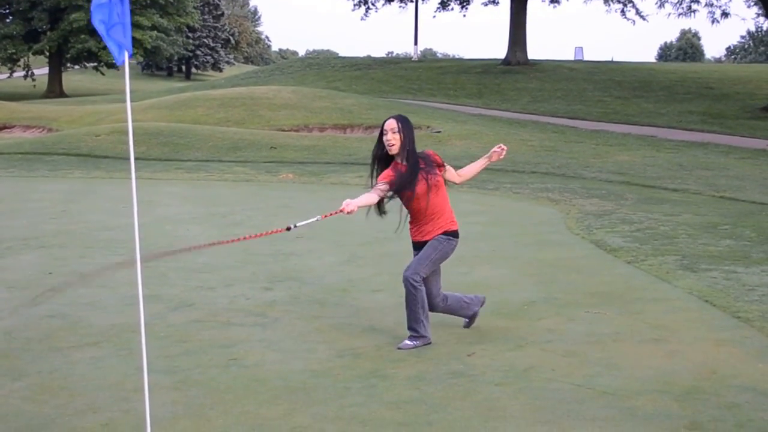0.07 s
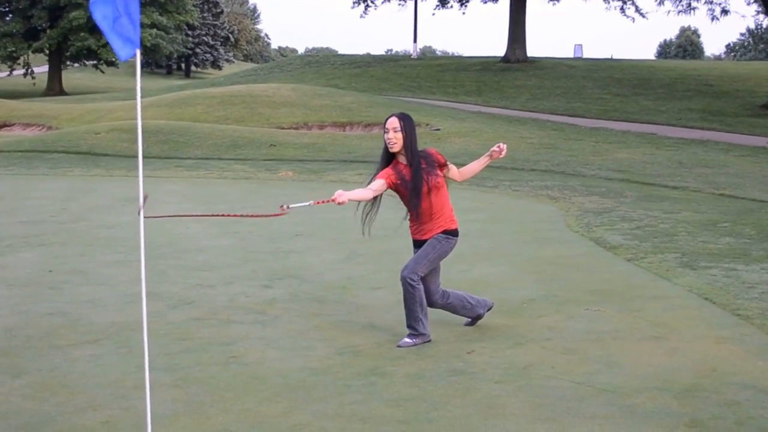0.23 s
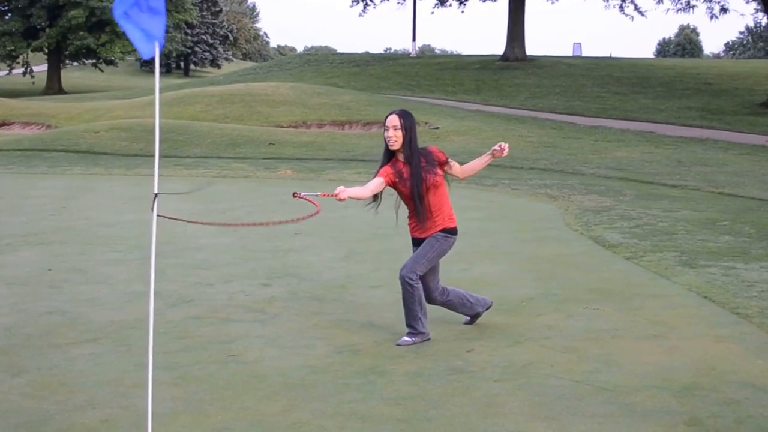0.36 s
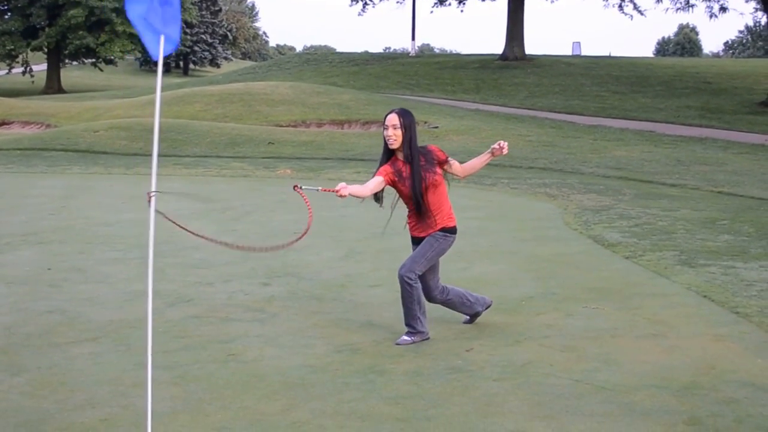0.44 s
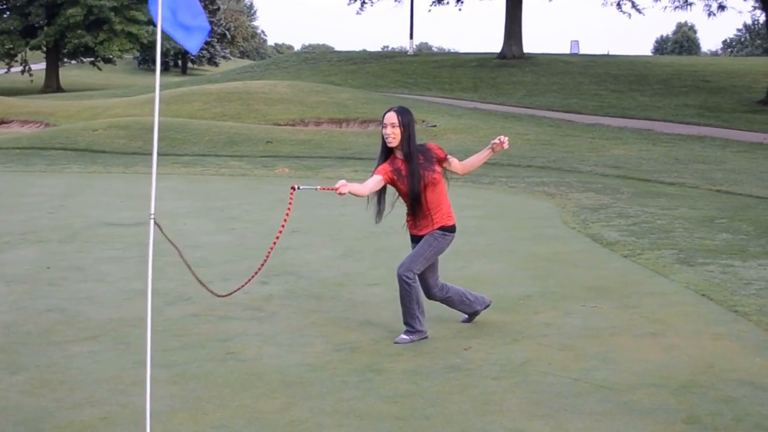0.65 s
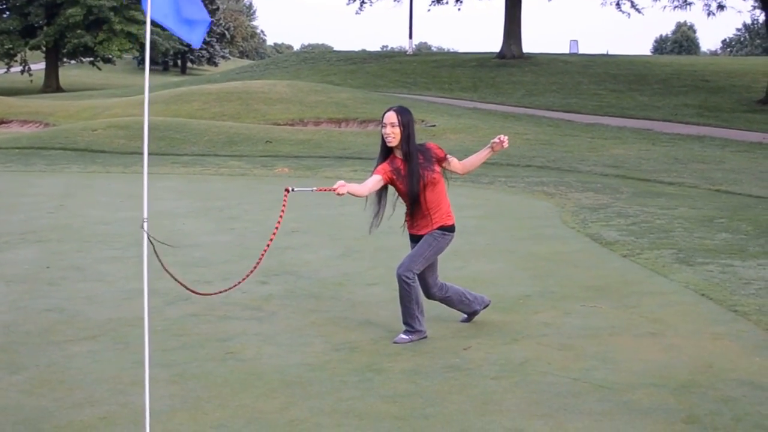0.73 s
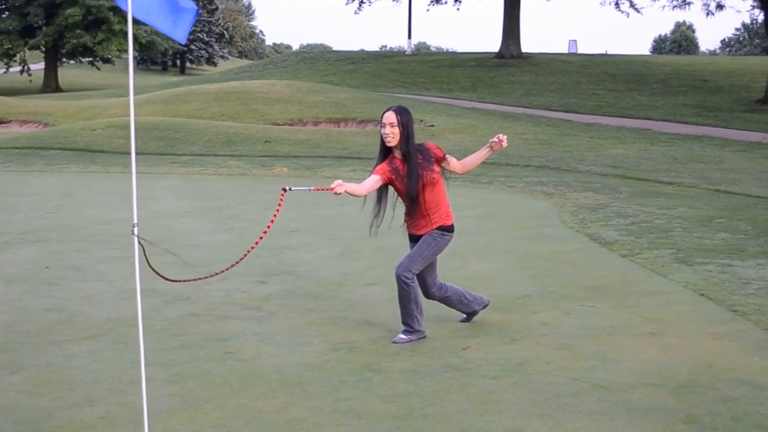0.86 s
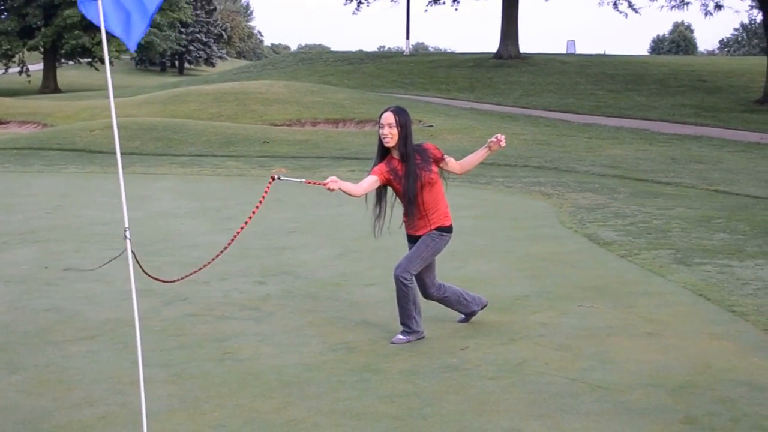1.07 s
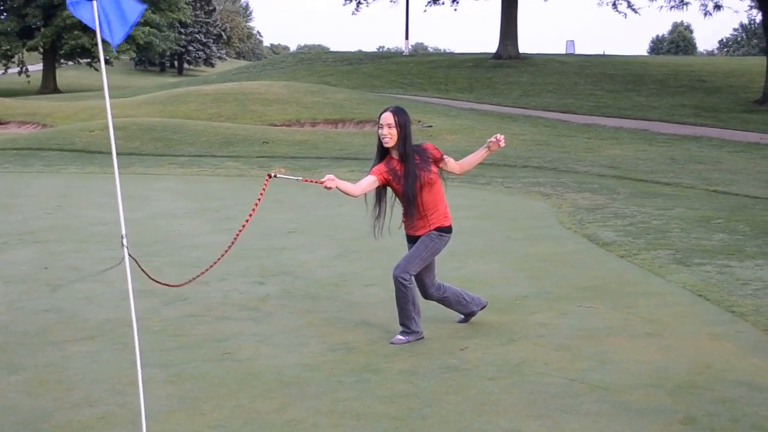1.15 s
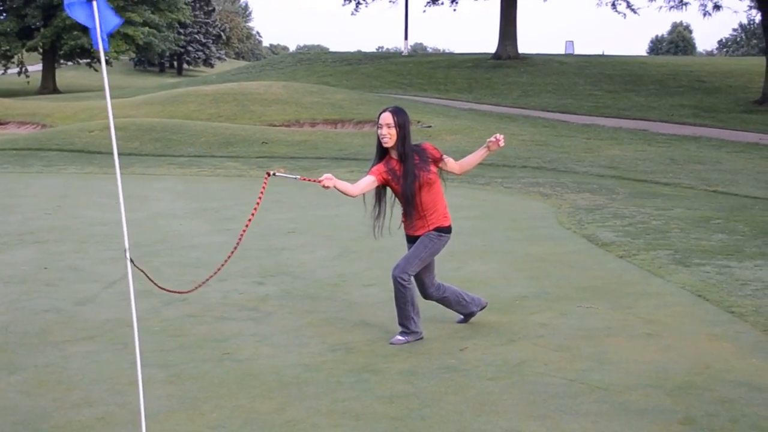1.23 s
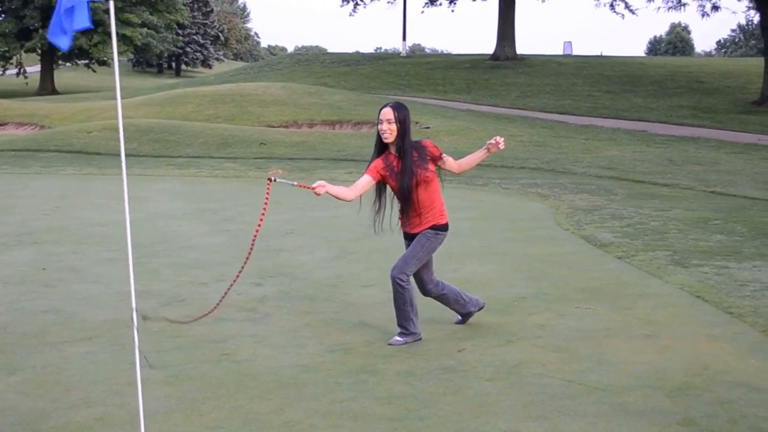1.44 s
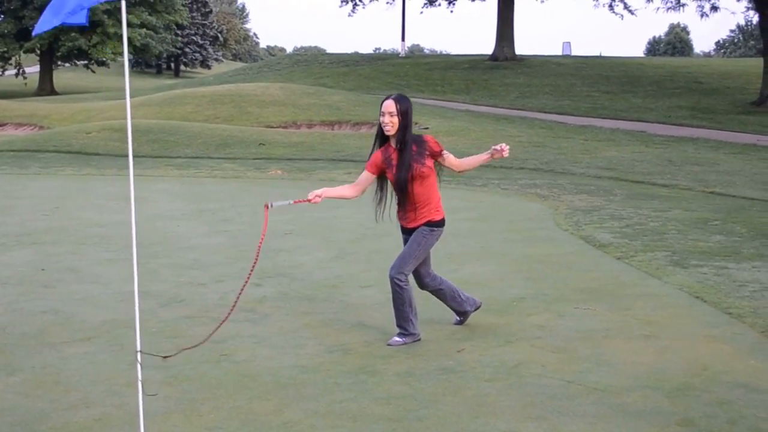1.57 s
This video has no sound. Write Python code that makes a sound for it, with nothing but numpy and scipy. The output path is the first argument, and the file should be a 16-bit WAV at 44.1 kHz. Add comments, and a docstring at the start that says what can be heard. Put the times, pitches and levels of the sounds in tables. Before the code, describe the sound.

A whip crack dominates: a swish accelerates from the start, rushing up to one very loud, clipped snap at 0.22 s with a brief noisy wake. From about 0.25 to 0.4 s trees throw back spiky, knocking echoes, then dull thuds until 0.55 s and a darkening tail. Distant traffic, faint motor hum and thin insect buzz continue; tiny lash rustles at 0.9-1.3 s, two faint bird notes near 1.4-1.5 s.

```python
"""Distant traffic, a motor hum and a thin pulsing insect lie under everything on an open lawn.
A whip's lash swishes faster and faster, with a soft push and a last rush of noise, then cracks once.
The crack is a few damped tones that overload the microphone, with a noisy wake and a thin ring on top.
Trees near and far return shaped noise and hard knocks, a rough, darkening echo with late dull thuds.
Then small rustles of noise are heard as the lash slides down a pole, and a faint bird whistles twice."""
import sys
import numpy as np
from scipy import signal
from scipy.fft import rfft, irfft, next_fast_len
from scipy.io import wavfile
from scipy.ndimage import uniform_filter1d, map_coordinates

SR = 44100
rng = np.random.default_rng(int(sys.argv[2]) if len(sys.argv) > 2 else 0)


def store_wav(level_fs):
    """Save 16-bit WAV to argv[1]."""
    pcm = np.round(np.clip(np.atleast_2d(level_fs), -1, 1) * 32767)
    wavfile.write(sys.argv[1], SR, pcm.T.astype(np.int16))


def to_linear_factor(level_db):
    """Convert decibel levels (scalar or array-like) to linear amplitude factors."""
    exponent = np.asarray(level_db, float) / 20
    return 10 ** exponent


N = 70560  # length in samples
T = np.arange(N) / SR  # time in seconds
CRACK_S = .220537  # moment of the shock


def unit(x):
    """Scales a sound to rms 1."""
    return x / np.sqrt(np.mean(x ** 2) + 1e-20)


def coloured(x, spectrum):
    """Filters x through a (pitch_hz, level_db) curve on a log pitch axis, then scales it to rms 1."""
    size = next_fast_len(N + 8192)
    curve_hz, curve_db = np.transpose(spectrum)
    hz = np.fft.rfftfreq(size, 1 / SR)
    gain = to_linear_factor(np.interp(np.log(hz + 1), np.log(curve_hz), curve_db, -120, -120))
    return unit(irfft(rfft(x, size) * gain, size)[:N])


def noise(spectrum):
    """Steady random hiss with the given spectrum, rms 1."""
    return coloured(rng.standard_normal(N), spectrum)


def spiky_noise(spectrum, spike_db, rate):
    """Hiss whose level jumps about at random before it is coloured; rate is in knots a second."""
    return coloured(rng.standard_normal(N) * to_linear_factor(spike_db * wobble(rate)), spectrum)


def wobble(rate):
    """A smooth random curve through rate random knots a second."""
    knots = rng.standard_normal(int(N * rate / SR) + 4)
    return map_coordinates(knots, [T * rate])


def ring(start_s, hz, t60_s, attack_s):
    """A sine that sets in at start_s and dies away by 60 dB in t60_s, like a struck resonance."""
    t = np.maximum(T - start_s, 0)
    return np.sin(2 * np.pi * hz * t) * to_linear_factor(-60 * t / t60_s) * (1 - np.exp(-t / attack_s))


# Spectrum of the far roar: pitch_hz, level_db (relative, per Hz)
TRAFFIC_SPECTRUM = [(15, -59), (25, -37), (70, -8.5), (118, -5), (219, -1.5), (331, -11), (979, -5),
                    (1480, -5.5), (2070, -12.5), (2970, -15.5), (4160, -25.5), (5600, -38), (7000, -46.5),
                    (10300, -50), (11300, -68)]
# Loudness of the roar over time: time_s, level_db
TRAFFIC_LEVEL = [(0.0, -38.5), (0.266, -40.5), (1.6, -40)]


def traffic():
    """Far roar: noise made patchy in time and pitch, then coloured, with a slightly unsteady level."""
    grains = signal.stft(rng.standard_normal(N + 512), nperseg=512)[2]
    patches = uniform_filter1d(rng.standard_normal(grains.shape), 6, 0)  # smooth over pitch
    patches = unit(uniform_filter1d(patches, 8, 1))  # smooth over time
    patchy = signal.istft(grains * to_linear_factor(0.72 * patches), nperseg=512)[1][:N]
    time_s, level_db = np.transpose(TRAFFIC_LEVEL)
    level = np.interp(T, time_s, level_db) + .5 * wobble(11.0)
    return to_linear_factor(level) * coloured(patchy, TRAFFIC_SPECTRUM)


# Tones of the motor: pitch_hz, level_db (rms, before it wavers)
HUM_TONES = [(75.4, -55.5), (150.7, -56.5), (258.4, -57)]


def motor_hum():
    """Low steady tones of a motor, wavering in level and phase."""
    out = np.zeros(N)
    for pitch_hz, level_db in HUM_TONES:
        level = np.sqrt(2) * to_linear_factor(level_db + 1.5 * wobble(6.7))
        out += level * np.sin(2 * np.pi * pitch_hz * T + 1.5 * wobble(14))
    return out


def insect():
    """A thin high tone with an unsteady phase, switched in pulses whose pace drifts."""
    pitch_hz, pulses_per_s = 10590, 76
    pace = pulses_per_s + 3 * wobble(4)
    pulses = np.maximum(np.sin(2 * np.pi * np.cumsum(pace) / SR) + 0.44, 0)
    level = to_linear_factor(-82.5 + 1.5 * wobble(30))
    return level * pulses * np.sin(2 * np.pi * pitch_hz * T + .7 * wobble(300))


# Two whistled notes, each a path of points: time_s, pitch_hz, level_db (rms, before roughening)
BIRD_NOTES = [
    [(1.385, 2970, -60), (1.4, 2960, -52), (1.417, 2920, -52), (1.428, 2430, -52), (1.438, 2360, -44.5),
     (1.447, 2350, -45.5), (1.452, 2350, -60)],
    [(1.478, 2700, -60), (1.494, 2880, -55), (1.504, 3100, -50.5), (1.525, 2950, -54), (1.535, 2930, -62)],
]


def bird():
    """Two far sines that slide in pitch, roughened by the air and leaves between."""
    out = np.zeros(N)
    for note in BIRD_NOTES:
        time_s, pitch_hz, level_db = np.transpose(note)
        level = np.interp(T, time_s, level_db, -120, -120) + 2 * wobble(200)
        phase = 2 * np.pi * np.cumsum(np.interp(T, time_s, pitch_hz)) / SR
        out += np.sqrt(2) * to_linear_factor(level) * np.sin(phase + .35 * wobble(250))
    return out


# Puffs of the sliding lash: start_s, length_s (up to the fade-out), level_db, loudest_hz
RUSTLES = [(.911, .005, -59, 4500), (.9378, .0012, -47, 3200), (.941, .006, -52, 3200),
           (.985, .0015, -57, 6000), (1.121, .011, -63, 7200), (1.208, .0033, -66, 9000),
           (1.262, .013, -66, 7500), (1.278, .0054, -58, 6200), (1.286, .011, -61, 8500)]


def rustles():
    """Short grainy puffs of treble as the lash slides down a pole, each with its own loudest band."""
    edge_hz, slope_db = 10000, -9  # above its loudest pitch a puff loses 9 dB an octave up to the edge
    out = np.zeros(N)
    for start_s, length_s, level_db, loudest_hz in RUSTLES:
        fade_in = (T - start_s) / 0.0014
        fade_out = (start_s + length_s - T) / 0.0017 + 1
        shape = np.clip(np.minimum(fade_in, fade_out), 0, 1)
        edge_db = slope_db * np.log2(edge_hz / loudest_hz)
        spectrum = [(loudest_hz * 0.5, -30), (loudest_hz, 0), (edge_hz, edge_db), (11500, -45)]
        out += to_linear_factor(level_db) * shape * spiky_noise(spectrum, 2.3, 1000)
    return out


# Dull far echoes off slopes: peak_s, level_db
THUDS = [(0.446, -39.5), (0.471, -34), (0.502, -39), (0.554, -38.5)]
# Their spectrum: pitch_hz, level_db (relative, per Hz)
THUD_SPECTRUM = [(400, -35.5), (600, -5), (1100, -3), (1800, -33)]


def thuds():
    """Short low puffs of noise, swelling and fading in a bell shape as far slopes return the crack."""
    half_length_s = 0.0058
    shape = sum(to_linear_factor(level_db) * np.exp(-((T - peak_s) / half_length_s) ** 2) for peak_s, level_db in THUDS)
    return shape * noise(THUD_SPECTRUM)


# Rise and fall of the echo: time_s, level_db (before the lift below)
ECHO_LEVEL = [(0.237, -52), (.2505, -72), (.253, -41.5), (.259, -41), (0.268, -59), (.278, -55),
              (.2838, -65), (0.2863, -43), (0.288, -35.5), (0.301, -33), (.318, -31.5), (0.337, -31.5),
              (0.352, -37.5), (0.385, -36.5), (0.394, -41.5), (.43, -50.5), (.52, -55), (.545, -51),
              (.7, -53.5), (.8, -55.5), (1.199, -64.5)]
# Spectra of bright near leaves, fuller trunks and boughs, dull far trees:
# pitch_hz, level_db (relative, per Hz)
NEAR_SPECTRUM = [(500, -33), (1200, -13), (2000, -4), (2800, 3), (4500, -3.5), (6500, -6), (9560, -17),
                 (11000, -31), (11800, -73)]
MIDDLE_SPECTRUM = [(400, -27), (850, -2.5), (1270, -1.5), (3480, 0), (6000, -9), (8770, -16.5),
                   (10900, -28), (11800, -68)]
FAR_SPECTRUM = [(350, -24), (600, -19), (1000, 0), (2000, -1.5), (4040, -9), (7000, -26.5), (10400, -37),
                (11500, -70.5)]
# Cross-fades near to middle and middle to far: start_s, end_s
NEAR_TO_MIDDLE = [.305, 0.316]
MIDDLE_TO_FAR = [0.42, 0.53]
# Extra level of each spectrum: near_db, middle_db, far_db
ECHO_LIFT = [6.5, 5.5, 7.5]


def trees():
    """Spiky noise for countless small echoes, duller as they come from farther away."""
    late = np.interp(T, NEAR_TO_MIDDLE, [0, 1])
    far = np.interp(T, MIDDLE_TO_FAR, [0, 1])
    shares = [1 - late, late * (1 - far), far]
    spectra = [NEAR_SPECTRUM, MIDDLE_SPECTRUM, FAR_SPECTRUM]
    leaves = np.zeros(N)
    for share, spectrum, lift_db in zip(shares, spectra, ECHO_LIFT):
        leaves += to_linear_factor(lift_db) * np.sqrt(share) * spiky_noise(spectrum, 3, 900)
    time_s, level_db = np.transpose(ECHO_LEVEL)
    return leaves * to_linear_factor(np.interp(T, time_s, level_db, -120, -120))


# Single hard echoes: start_s, level_db, pitch_hz
TRUNKS = [(.3, -11, 4000), (.3123, -14, 3000), (.3188, -13, 3000), (.324, -9.5, 2400), (.344, -16, 1600),
          (.3761, -11, 4000)]


def trunks():
    """Very short damped tones, the hard echoes of single trunks."""
    return sum(to_linear_factor(level_db) * ring(start_s, pitch_hz, .0017, .0001)
               for start_s, level_db, pitch_hz in TRUNKS)


# Spectrum of the swish: pitch_hz, level_db (relative, per Hz)
SWISH_SPECTRUM = [(1500, -12), (2500, 3.5), (6000, -6), (10000, -11.5), (11500, -43)]


def swish():
    """Noise that swells as the lash speeds up and dies quickly after the crack."""
    level_db, rise_s, t60_s = -44, .03, .06
    rise = np.exp(np.minimum(T - CRACK_S, 0) / rise_s)
    fade = to_linear_factor(-60 * np.maximum(T - CRACK_S, 0) / t60_s)
    return to_linear_factor(level_db) * rise * fade * noise(SWISH_SPECTRUM)


def soft_push():
    """A low damped tone just ahead of the crack, starting downwards."""
    start_s, pitch_hz, level_db = .2088, 600, -23
    return -to_linear_factor(level_db) * ring(start_s, pitch_hz, .006, .0003)


# Spectrum of the last rush: pitch_hz, level_db (relative, per Hz)
RUSH_SPECTRUM = [(180, -56), (300, -29.5), (2400, -5), (3350, -17.5), (4990, -20), (8090, -15.5),
                 (13100, -27), (16000, -42)]


def rush():
    """The last rush of the tip: noise that climbs steeply and stops at the crack."""
    level_db, rise_s = -20, .004
    rise = np.exp(np.minimum(T - CRACK_S, 0) / rise_s)
    return to_linear_factor(level_db) * rise * (T < CRACK_S) * noise(RUSH_SPECTRUM)


# Spectrum of the wake: pitch_hz, level_db (relative, per Hz)
WAKE_SPECTRUM = [(250, -8), (1500, -10), (2700, 1), (4000, -3), (6000, -3), (9500, -9), (11000, -25),
                 (12000, -60)]


def wake():
    """The noisy wake of the shock, dying away fast."""
    level_db, t60_s = -16.5, .028
    fade = to_linear_factor(-60 * np.maximum(T - CRACK_S, 0) / t60_s)
    return to_linear_factor(level_db) * fade * (T >= CRACK_S) * noise(WAKE_SPECTRUM)


def thin_ring():
    """A very high, brief tone set off by the sharp second front of the shock."""
    delay_s, pitch_hz, level_db = .00077, 12250, 14  # level before the slow attack and fast decay
    return to_linear_factor(level_db) * ring(CRACK_S + delay_s, pitch_hz, t60_s=.0013, attack_s=.0004)


# Resonances of air and housing: pitch_hz, level_db (before overload), t60_s
SHOCK = [(1650, 12, .0052), (675, 6, .0057), (2090, 2, .008), (320, 3.7, .008), (205, -6, .0125)]


def shock():
    """The crack: damped tones of alternating sign, heard once directly and once more off the lawn."""
    lawn_delay_s, lawn_db = .00165, -14
    out = np.zeros(N)
    for k, (pitch_hz, level_db, t60_s) in enumerate(SHOCK):
        sign = -(-1) ** k
        for delay_s, loss_db in ((0, 0), (lawn_delay_s, lawn_db)):
            out += sign * to_linear_factor(level_db + loss_db) * ring(CRACK_S + delay_s, pitch_hz, t60_s, .0001)
    return out


def overload(air):
    """The microphone's limit: loud peaks flatten towards a ceiling, quiet sound passes unchanged."""
    ceiling, hardness = .61, 5
    return air / (1 + np.abs(air / ceiling) ** hardness) ** (1 / hardness)


def scene():
    """Mixes everything; the wake and thin ring ride on top of the flattened sound."""
    floor = traffic() + motor_hum() + insect() + bird() + rustles()
    echoes = thuds() + trees() + trunks()
    lash = swish() + soft_push() + rush() + shock()
    return (overload(floor + echoes + lash) + wake() + thin_ring())[None]


def roll_off(x):
    """The treble ends steeply here."""
    return signal.sosfilt(signal.butter(12, 16690, fs=SR, output="sos"), x)


def record(dry):
    """Limits the sound to the microphone's band without shifting it in time, then ends the treble steeply with
    a one-way filter that delays it slightly."""
    band = signal.butter(4, 16300, fs=SR, output="sos")  # top of the band in Hz
    mix = signal.sosfiltfilt(band, dry)
    return roll_off(mix)


dry = scene()
out = record(dry)
store_wav(out)
```